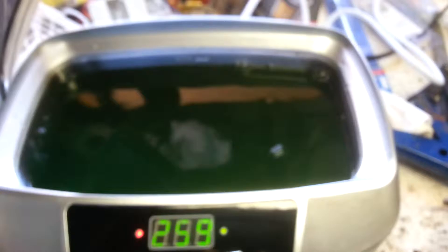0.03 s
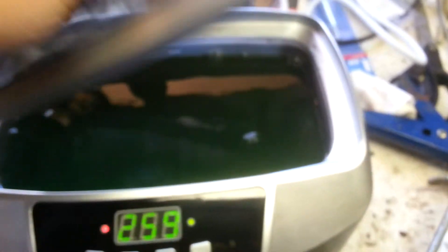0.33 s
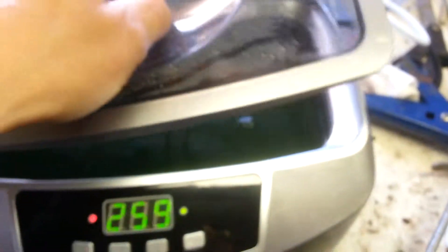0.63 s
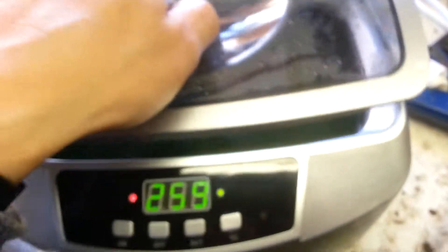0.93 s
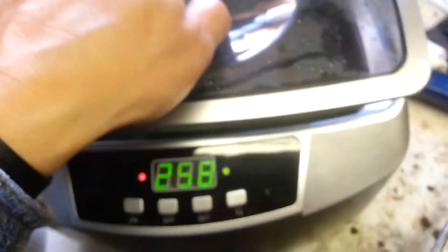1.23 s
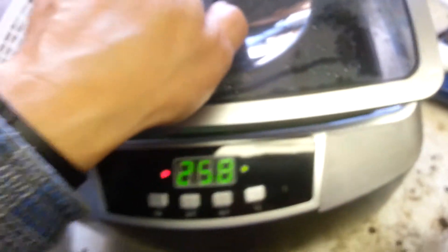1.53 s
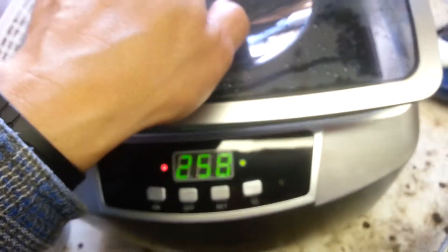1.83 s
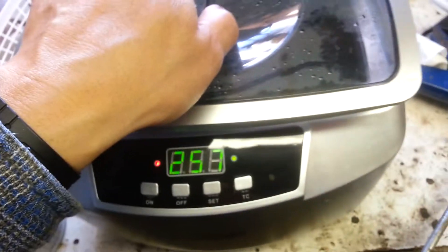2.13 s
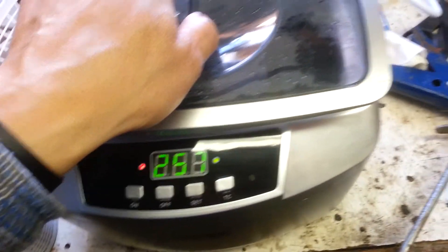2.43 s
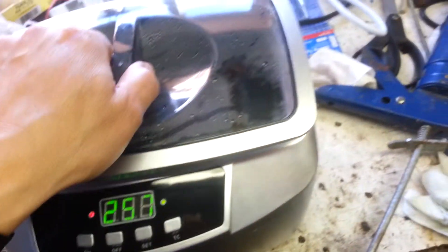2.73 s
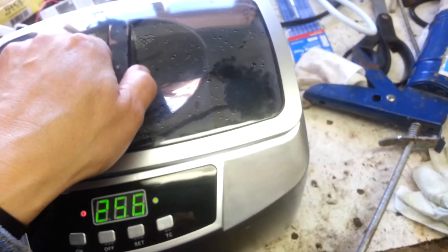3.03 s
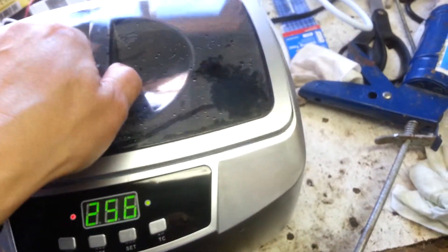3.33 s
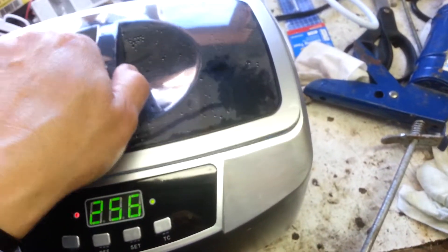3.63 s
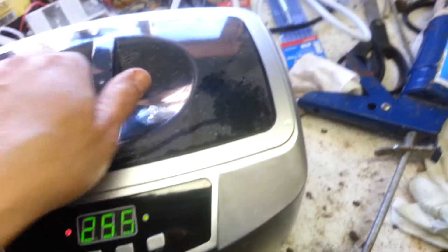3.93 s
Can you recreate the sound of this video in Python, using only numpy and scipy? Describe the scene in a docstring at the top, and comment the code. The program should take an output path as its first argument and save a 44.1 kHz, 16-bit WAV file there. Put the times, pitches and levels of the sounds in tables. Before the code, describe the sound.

An ultrasonic cleaner hisses and buzzes throughout, close on the left, with a high, throbbing ring over a faint low hum. A soft knock dies away at the start. The plastic lid snaps lightly just before 1 second, followed by dull taps until 1.4. The ring surges between 1.5 and 2.2 seconds. The lid clatters at 3 seconds, then knocks and thumps into its seat around 3.5 to 3.7.

```python
"""A pulsing hiss with a high, throbbing ring, close on the left: an ultrasonic cleaner on a workbench.
Cavitation in the bath hisses in bursts, twice per mains cycle, and rings the steel tank
over a low hum and a patchy background rush. A faint knock dies away at the start. A hand brings
the plastic lid over the bath: a snap, a few dull taps, then it clatters and thumps into its seat."""
import sys
import numpy as np
from scipy import signal
from scipy.fft import rfft, irfft
from scipy.io import wavfile
from scipy.ndimage import uniform_filter1d

SR = 44100
rng = np.random.default_rng(int(sys.argv[2]) if len(sys.argv) > 2 else 0)


def pcm_store(signal):
    """Save signal as 16-bit PCM."""
    levels = np.round(np.clip(np.atleast_2d(signal), -1, 1) * 32767)
    wavfile.write(sys.argv[1], SR, levels.astype(np.int16).T)


N = 176400
T = np.arange(N) / SR
HZ = np.fft.rfftfreq(N, 1 / SR)
MAINS_HZ = 59.985
FRAMES = dict(nperseg=2048, noverlap=1536)

# Table levels are relative within each source; pan_db is left minus right.
# finest bubbles: time_s, level_db, pan_db
FIZZ_LEVEL = [(0.02, -32, 11), (0.1, -29, 7.5), (0.2, -31.5, 9), (0.46, -30.5, 10), (0.8, -31, 9.5),
              (1.17, -28.5, 13), (1.93, -28.5, 16), (1.95, -29.5, 13), (2.57, -27.5, 17), (2.79, -28.5, 16),
              (2.86, -27.5, 19.5), (3.0, -27, 15), (3.02, -26.5, 18.5), (3.21, -28.5, 12), (3.47, -26, 17),
              (3.5, -28, 11), (3.55, -30, 13), (3.65, -25.5, 17), (3.82, -31.5, 16), (3.98, -30.5, 28)]
# fizz, bath open: freq_hz, density_db
FIZZ_OPEN = [(5000, -28), (7000, -6.5), (8500, -6), (9500, -4), (10500, 2.5), (11200, 6), (12000, 1),
             (13300, 2), (14500, -1)]
# fizz, bath covered: freq_hz, density_db
FIZZ_COVERED = [(5000, -66), (7000, -12.5), (8500, -14), (9500, -7), (10500, -3), (11200, 3), (12000, 1),
                (13300, 3.5), (14500, -2.5)]
# fizz, right channel: freq_hz, extra_db
FIZZ_RIGHT = [(7000, 5), (9000, -1), (11000, -6.5), (13000, -6), (14400, -1)]
# coarser bubbles: time_s, level_db, pan_db
SIZZLE_LEVEL = [(0.02, -39, 7), (0.47, -37, 12), (0.67, -40, 11), (0.8, -37.5, 15), (0.91, -37, 6.5),
                (1.13, -36.5, 11.5), (1.3, -37, 12), (1.72, -37.5, 11.5), (2.29, -37, 13.5),
                (3.14, -35.5, 10), (3.2, -36, 12), (3.38, -35.5, 10), (3.55, -35.5, 12), (3.7, -35, 8.5),
                (3.76, -36.5, 12), (3.98, -36, 11)]
# sizzle: freq_hz, density_db
SIZZLE_SPECTRUM = [(1700, -28), (2050, -14.5), (2350, -4), (3000, -4.5), (3600, 2.5), (4500, -2),
                   (5500, -4), (6100, -3), (6800, -8), (8500, -10)]
# sizzle, bath open: freq_hz, extra_db
SIZZLE_OPEN = [(1800, 11), (2500, 1.5), (3000, -0.5), (3600, -3.5), (4500, -2), (5500, -4.5), (7000, -4.5)]
# sizzle, right channel: freq_hz, extra_db
SIZZLE_RIGHT = [(2000, 7.5), (2800, 5.5), (3500, 8.5), (3700, -20), (4000, -9), (4500, -4), (5200, -1.5),
                (6000, -4), (6600, 6.5)]
# tank resonances: centre_hz, width_hz, lift_open_db, lift_ajar_db, lift_seated_db
TANK_MODES = [(2700, 110, 0, 6.4, 2.2), (3993, 59, 7, 7.9, 3.4), (4137, 36, 9.5, 8.9, 4.8),
              (4370, 97, 7, 9.6, 7.2), (4680, 59, 7.5, 6, 5.5), (4720, 40, 8, 4.9, 11),
              (5160, 110, 12, 13.4, 9.7), (5730, 250, 10, 6.9, 3.4), (6470, 380, 14.5, 12.4, 6.9)]
# band cancelled by the lid's reflection: time_s, centre_hz, gain_db
LID_NOTCH = [(0.45, 5300, 0), (0.7, 5420, -7), (0.99, 5520, -15), (1.12, 6080, -8), (2.35, 6170, -8),
             (2.7, 6170, -1)]
# main tank resonance: freq_hz, density_db
RING_SPECTRUM = [(2700, -60), (3050, -25), (3140, -4.5), (3190, 5), (3245, -9), (3325, 5.5), (3375, 3),
                 (3480, -13), (3650, -19), (4000, -27)]
# ring contour, before scaling by swing: time_s, level_db
RING_CONTOUR = [(0.02, -47), (0.13, -43), (0.22, -46), (0.25, -26.5), (0.35, -55.5), (0.41, -28.5),
                (0.45, -43), (0.53, -25), (0.65, -35), (0.67, -21), (0.79, -45), (0.81, -32), (0.92, -49),
                (1.04, -40), (1.07, -48), (1.17, -25), (1.24, -36), (1.27, -19), (1.35, -40), (1.4, -20),
                (1.42, -29), (1.46, -41), (1.53, -11), (1.56, -36), (1.59, -16.5), (1.75, -50.5),
                (1.77, -28.5), (1.83, -34), (1.86, -37.5), (1.92, -28.5), (1.94, -38), (1.98, -14),
                (2.05, -31), (2.07, -30), (2.26, -37), (2.28, -34), (2.38, -33), (2.46, -50), (2.48, -37.5),
                (2.62, -35), (2.64, -30), (2.72, -47), (2.99, -31), (3.01, -41), (3.06, -19), (3.16, -45),
                (3.2, -32), (3.26, -49), (3.43, -36), (3.47, -50), (3.5, -21), (3.55, -36), (3.57, -16),
                (3.59, -50), (3.64, -37), (3.68, -34.5), (3.85, -29.5), (3.88, -17), (3.9, -36),
                (3.98, -22)]
# ring and whine position: time_s, pan_db
RING_PAN = [(0.02, 23), (0.59, 16), (0.81, 11.5), (2.18, 20), (2.57, 8), (3.98, 18)]
# surges of the main mode: peak_s, level_db, half_length_s, pitch_hz
WHINES = [(0.53, -33, .025, 3300), (0.69, -33, .03, 3220), (1.53, -28.5, .018, 3345),
          (1.597, -26.5, .012, 3345), (1.825, -30, .012, 3360), (1.983, -26.5, .012, 3330),
          (2.015, -30, .018, 3340), (2.083, -28.5, .018, 3360), (2.13, -29, .012, 3350),
          (2.167, -28, .011, 3375), (2.21, -31, .018, 3350), (3.88, -31, .015, 3230),
          (3.972, -29.5, .015, 3300)]
# lid on rim: start_s, level_db, favoured_hz, clack_db, t60_ratio
KNOCKS = [(0.001, -21.5, 716, -15, 0.58), (2.997, -26, 1090, 16, 0.49), (3.015, -30, 1700, 12, 0.8),
          (3.0235, -24.5, 1500, 1.5, 1.2), (3.0525, -9.5, 478, -8, 0.82), (3.069, -9, 640, -2.5, 0.78),
          (3.0805, -2.5, 537, -8, 0.71), (3.0885, -3.5, 665, -19, 0.65), (3.1015, -18.5, 520, -18, 1.5),
          (3.149, -15, 465, -7, 0.46), (3.165, -19, 437, -11, 0.88), (3.417, -26, 424, 5, 0.61),
          (3.443, -24, 600, -9, 0.55), (3.497, -6.5, 650, 1, 1), (3.5105, -14, 670, 11, 0.54),
          (3.5142, -3, 666, -6.5, 0.69), (3.5205, -25, 700, 8, 0.27), (3.577, -12.5, 650, -19, 0.33),
          (3.6645, -13.5, 713, 0, 0.74), (3.932, -18, 357, -14, 0.1)]
# lid and case modes: freq_hz, level_db, t60_s
LID_MODES = [(299, 11.5, 0.087), (344, 12, 0.061), (395.5, 7, 0.22), (440, 9.5, 0.052), (555, 10.5, 0.086),
             (640, 15, 0.051), (662, 10.5, 0.064), (694, -31.5, 0.2), (944, 13.5, 0.19), (1154, 12, 0.08),
             (1456, 8, 0.06), (1717, 10, 0.14), (2070, -45, 0.034), (2230, 1, .07)]
# lid edge clack: freq_hz, density_db
CLACK_SPECTRUM = [(40, -31), (150, -14), (500, 4.5), (700, 8), (900, -7), (1300, 1.5), (1800, -2),
                  (2600, -7.5), (4200, -10.5), (5200, -19), (8000, -21), (14000, -40)]
# clack, left channel: freq_hz, extra_db
CLACK_LEFT = [(1200, 1), (2400, 7), (4200, 15), (6000, 7)]
# low thumps, a dying knock then the lid seating: start_s, level_db, final_hz, t60_s, sag_ratio
THUMPS = [(0.001, -21, 162, 0.043, 0.38), (0.002, -33.5, 323, 0.1, 0.32), (3.149, -16.5, 423, 0.029, .1),
          (3.5139, -9, 401, 0.091, 0.16), (3.585, -21, 380, 0.042, 0.21), (3.668, -12.5, 351, 0.073, 0.54),
          (3.67, -22.5, 171, 0.055, 0.32)]
# touches on the carried lid: start_s, level_db, pitch_hz, t60_s, pan_db
TAPS = [(1.089, -11, 404, 0.0022, 26), (1.1761, -22, 526, 0.011, 29), (1.2502, -14.5, 281, 0.0087, 32),
        (1.2813, -9.5, 296, 0.0089, 32), (1.3518, -8.5, 500, 0.007, 28), (1.381, -6, 414, 0.006, 30),
        (1.396, -17.5, 606, 0.013, 22)]
# mains hum: harmonic, level_db
HUM_LINES = [(6, -60.5), (7, -63), (8, -63), (12, -67)]
# low background rush: freq_hz, density_db
RUSH_SPECTRUM = [(25, -36), (90, 2), (140, -3.5), (220, 7.5), (300, -4), (360, 6), (420, 7.5), (500, 2),
                 (580, -5), (690, 4), (800, -3), (880, 1.5), (950, 1.5), (1080, -3), (1200, 2),
                 (1400, -3.5), (1510, -5.5), (1700, -6.5), (2100, -1), (3000, -34)]
# rush, band gaps on the left: freq_hz, extra_db
RUSH_LEFT = [(120, -42), (220, -1), (720, 5), (850, -32), (950, 4.5), (1100, -44), (1210, -3.5),
             (1350, -22), (1510, 13), (1750, -53), (2100, 3.5)]
# rush contour: time_s, level_db
RUSH_LEVEL = [(0.1, -50.5), (1.39, -43), (2.42, -47.5), (3.4, -43), (3.65, -40), (3.75, -42), (3.98, -44.5)]
# rush, left-right likeness: freq_hz, correlation
RUSH_CORRELATION = [(100, 0.2), (300, 0.79), (700, 0.49), (1000, 0.11), (2000, 0.082)]
# handling bumps: peak_s, level_db, half_length_s
BUMPS = [(0.025, -47, 0.087), (0.1, -57, 0.12), (0.526, -49, 0.044), (0.597, -41, 0.019),
         (0.853, -47, .025), (0.907, -51, 0.019), (1.185, -37, 0.035), (1.274, -39, 0.04),
         (1.372, -40, 0.02)]


def fizz(gain_db=3, flutter_db=0.68, cover_mid_s=1.0, cover_span_s=0.24):
    """The finest bubbles collapse in a top hiss; its colour shifts as the lid covers the bath."""
    covered_db, open_db = spectrum(FIZZ_COVERED), spectrum(FIZZ_OPEN)
    covered_hiss = drifting_hiss(covered_db + np.array([0 * HZ, spectrum(FIZZ_RIGHT)]))
    open_hiss = unit_rms(irfft(rfft(covered_hiss) * amp(open_db - covered_db), N))
    covered = ramp(T, cover_mid_s, cover_span_s)
    hiss = (1 - covered) * open_hiss + covered * covered_hiss
    level_db = curve(FIZZ_LEVEL) + gain_db + flutter_db * wander(56)
    return hiss * bursts(depth_db=4.5, lag=0.91) * amp(level_db) * pan(curve(FIZZ_LEVEL, column=2))


def drifting_hiss(density_db, comb_db=2, width_hz=57, count=16):
    """Small tank and bench resonances comb the hiss, shifting as hand, lid and microphone move."""
    kernel = np.exp(-.5 * (np.linspace(-500, 500, N // SR * 1000) / width_hz) ** 2)
    position = T / T[-1] * (count - 1)
    hiss = np.zeros((2, N))
    for k in range(count):
        comb = unit_rms(signal.fftconvolve(rng.standard_normal(len(HZ)), kernel, "same"))
        fade = np.cos(np.pi / 2 * np.minimum(abs(position - k), 1))
        hiss += fade * noise(density_db + comb_db * comb, correlation=0)
    return hiss


def bursts(depth_db, lag):
    """The drive swells twice per mains cycle; lag is a fraction of one burst."""
    return unit_rms(amp(depth_db * abs(np.sin(np.pi * (2 * MAINS_HZ * T - lag)))))


def sizzle(gain_db=6, flutter_db=0.94, grain_db=0.5, patch_db=2):
    """Larger bubbles collapse, heard through the tank's resonances."""
    hz, t, bins = signal.stft(rng.standard_normal((2, N)), SR, **FRAMES)
    hz = hz[:, None]
    left_db = spectrum(SIZZLE_SPECTRUM, hz) + tank_colour_db(hz, t)
    right_db = left_db + spectrum(SIZZLE_RIGHT, hz)
    colour_db = np.array([left_db, right_db]) + patch_db * patches(bins.shape)
    hiss = unit_rms(signal.istft(bins * amp(colour_db), **FRAMES)[1][:, :N])
    level_db = curve(SIZZLE_LEVEL) + gain_db + flutter_db * wander(21) + grain_db * wander(1800)
    return hiss * bursts(depth_db=4, lag=0.78) * amp(level_db) * pan(curve(SIZZLE_LEVEL, column=2))


def tank_colour_db(hz, t, sway_hz=14, notch_width_hz=300):
    """Tank resonances sway with the water and change under the lid, whose reflection cuts a notch."""
    covered = ramp(t, mid_s=1.116, span_s=0.084)
    seated = ramp(t, mid_s=2.15, span_s=0.41)
    colour_db = (1 - covered) * spectrum(SIZZLE_OPEN, hz)
    for centre_hz, width_hz, *lifts_db in TANK_MODES:
        mode_hz = centre_hz + sway_hz * np.interp(t, T, wander(4.7))
        lift_db = np.interp(covered + seated, [0, 1, 2], lifts_db)
        colour_db += lift_db / (1 + (2 * (hz - mode_hz) / width_hz) ** 2)
    notch_hz, notch_db = curve(LID_NOTCH, column=1, t=t), curve(LID_NOTCH, column=2, t=t)
    return colour_db + notch_db * np.exp(-(2 * (hz - notch_hz) / notch_width_hz) ** 2)


def tank_song(takeover=0.6):
    """The tank rings; in short surges a whine takes over."""
    surges = np.array([bell(peak_s, half_s) for peak_s, _, half_s, _ in WHINES])
    return (whine(surges) + ring() * (1 - takeover * surges.max(0))) * pan(curve(RING_PAN))


def ring(gain_db=3, throb_db=1.72, steadiness=0.12, swing=0.47):
    """The tank's close pair of modes sings, throbbing as the water sways."""
    analytic = signal.hilbert(noise(spectrum(RING_SPECTRUM), correlation=-0.83))
    song = unit_rms(analytic.real / (abs(analytic) + 1e-6) ** steadiness)  # flattens the envelope a bit
    contour_db = curve(RING_CONTOUR)
    level_db = contour_db.mean() + swing * (contour_db - contour_db.mean())
    return song * bursts(depth_db=6, lag=0.098) * amp(level_db + gain_db + throb_db * wander(59))


def whine(surges, jitter_hz=15):
    """The tank's main mode tightens to one pitch."""
    swell = amp([level_db for _, level_db, _, _ in WHINES]) @ surges
    pitch_hz = curve(WHINES, column=3) + jitter_hz * wander(34.3)
    return swell * np.sqrt(2) * sine(pitch_hz) * bursts(depth_db=5, lag=0.05)


def lid(tap_send=0.23):
    """A faint opening knock, then the lid is carried over and seated; the contacts excite the room."""
    taps, knocks = np.zeros((2, 2, N))
    for start_s, *row in TAPS:
        add(taps, start_s, tap(*row))
    add(taps, start_s=0.9383, sound=snap())
    for start_s, *row in THUMPS:
        add(knocks, start_s, thump(*row))
    clack_db = spectrum(CLACK_SPECTRUM) + np.array([spectrum(CLACK_LEFT), 0 * HZ])
    clack_noise, size = noise(clack_db, correlation=0.46), SR // 5
    for k, (start_s, *row) in enumerate(KNOCKS):
        edge_noise = np.roll(clack_noise, -k * size, 1)[:, :size]
        add(knocks, start_s, knock(*row, edge_noise))
    return taps + knocks + room(knocks + tap_send * taps)


def knock(level_db, favoured_hz, clack_db, t60_ratio, edge_noise,
          favour_db=18.5, favour_octaves=0.22, clack_t60_s=0.12):
    """Lid meets rim: the contact point favours some modes, the hand damps them, the edge clacks."""
    t = np.arange(edge_noise.shape[1]) / SR
    mode_hz, mode_db, t60_s = np.transpose(LID_MODES)[:, :, None]
    favour = np.exp(-.5 * (np.log2(mode_hz / favoured_hz) / favour_octaves) ** 2)
    modes = amp(mode_db + favour_db * favour) * np.sin(2 * np.pi * mode_hz * t)
    body = (modes * decay(t, t60_s * t60_ratio)).sum(0)
    body *= amp(1) / abs(body).max()
    clack = edge_noise * amp(clack_db - 8) * decay(t, clack_t60_s * t60_ratio)
    return amp(level_db) * (body + clack) * attack(t, rise_s=0.00057) * pan(-0.2)


def thump(level_db, final_hz, t60_s, sag_ratio, glide_s=0.0075, gain_db=6):
    """Low thump rising in pitch: a faint dying knock at the start, then the lid seating."""
    t = np.arange(SR // 4) / SR
    boom = sine(final_hz * (1 - sag_ratio * np.exp(-t / glide_s)))
    return amp(level_db + gain_db) * boom * attack(t, rise_s=0.0082) * decay(t, t60_s) * pan(0)


def tap(level_db, pitch_hz, t60_s, pan_db, overtone_ratio=2.1, overtone_db=-9, gain_db=1):
    """A damped touch on the held lid: a brief ring and a faster-dying overtone."""
    t = np.arange(SR // 20) / SR
    phase = 2 * np.pi * pitch_hz * t
    overtone = amp(overtone_db) * np.sin(overtone_ratio * phase) * decay(t, 0.6 * t60_s)
    touch = np.sin(phase) * decay(t, t60_s) + overtone
    return amp(level_db + gain_db) * touch * attack(t, rise_s=0.00017) * pan(pan_db)


def snap(gain_db=-9, pitch_hz=906, grit_db=-15, low_cut_hz=400):
    """The lid's edge snaps on the rim: a short ring, brighter edge modes, a gritty scrape."""
    t = np.arange(SR // 20) / SR
    body = np.sin(2 * np.pi * pitch_hz * t) * decay(t, t60_s=0.014)
    edge_hz_db = [(1350, 10.5), (2350, 9), (2850, 3), (3600, -15)]
    edge = sum(amp(db) * np.sin(2 * np.pi * hz * t) for hz, db in edge_hz_db) * decay(t, t60_s=0.003)
    grit_hz_db = [(200, -17), (750, -3), (1400, -1), (2700, -3), (5000, -31), (12000, -50)]
    grit = noise(spectrum(grit_hz_db), correlation=0.96)[:, :len(t)] * decay(t, t60_s=0.025)
    click = (body + edge + amp(grit_db) * grit) * attack(t, rise_s=0.00032)
    return amp(gain_db) * signal.lfilter(*signal.butter(1, low_cut_hz, "high", fs=SR), click) * pan(14)


def hum(waver_db=2, jitter_hz=4):
    """Rough mains harmonics from the case."""
    lines = np.zeros(N)
    for harmonic, level_db in HUM_LINES:
        peak = np.sqrt(2) * amp(level_db + waver_db * wander(8))
        lines += peak * sine(harmonic * MAINS_HZ + jitter_hz * wander(24))
    return lines


def handling(gain_db=4):
    """Faint low bumps as the hand moves."""
    swell = sum(amp(level_db) * bell(peak_s, half_s) for peak_s, level_db, half_s in BUMPS)
    rumble_hz_db = [(20, -4), (60, -1), (110, 2.5), (180, -10), (400, -12), (1500, -58)]
    return amp(gain_db) * swell * noise(spectrum(rumble_hz_db), correlation=0.27) * pan(25)


def rush(gain_db=1, swell_db=1, patch_db=4.5):
    """Low, patchy background rush, hollow and band-gapped on the left."""
    density_db = spectrum(RUSH_SPECTRUM) + np.array([spectrum(RUSH_LEFT), 0 * HZ])
    bins = signal.stft(noise(density_db, spectrum(RUSH_CORRELATION)), **FRAMES)[2]
    bins *= amp(patch_db * patches(bins.shape[1:]))
    wash = unit_rms(signal.istft(bins, **FRAMES)[1][:, :N])
    return wash * amp(curve(RUSH_LEVEL) + gain_db + swell_db * wander(11))


def room(dry, t60_s=0.45, gain_db=-21.5):
    """Small workshop: a short, dull tail."""
    t = np.arange(SR // 2) / SR
    tail_hz_db = [(100, 13.5), (700, 4.5), (3000, 0.5), (10000, -30)]
    tail = noise(spectrum(tail_hz_db), correlation=0.8)[:, :len(t)]
    tail *= decay(t, t60_s) * np.minimum(t / 0.0014, 1)
    return amp(gain_db) * signal.fftconvolve(dry, tail / np.linalg.norm(tail[0]), axes=1)[:, :N]


def amp(db):
    return 10 ** (np.asarray(db) / 20)


def unit_rms(x):
    return x / np.sqrt(np.mean(x ** 2) + 1e-20)


def sine(hz):
    return np.sin(2 * np.pi * np.cumsum(hz) / SR)


def attack(t, rise_s):
    return 1 - np.exp(-t / rise_s)


def decay(t, t60_s):
    return amp(-60 * t / t60_s)


def ramp(t, mid_s, span_s):
    return np.clip((t - mid_s) / span_s + .5, 0, 1)


def bell(peak_s, half_s):
    return np.exp(-((T - peak_s) / half_s) ** 2)


def spectrum(points, hz=HZ):
    """Table interpolated over log frequency."""
    freq_hz, values = np.transpose(points)
    return np.interp(np.log(hz + 1), np.log(freq_hz + 1), values)


def curve(rows, column=1, t=T):
    """Table column interpolated over time."""
    rows = np.array(rows)
    return np.interp(t, rows[:, 0], rows[:, column])


def add(mix, start_s, sound):
    """Mixes a stereo sound in place."""
    part = mix[:, round(start_s * SR):][:, :sound.shape[1]]
    part += sound[:, :part.shape[1]]


def pan(pan_db):
    """Left and right gains, mean square 1."""
    gains = amp(np.array([[1], [-1]]) * pan_db / 2)
    return gains / np.sqrt((gains ** 2).mean(0))


def wander(rate_hz):
    """Smooth random drift up to about rate_hz, unit rms."""
    return unit_rms(irfft(rfft(rng.standard_normal(N)) / (1 + (HZ / rate_hz) ** 4), N))


def noise(density_db, correlation):
    """Shaped stereo noise, unit rms."""
    left, independent = rfft(rng.standard_normal((2, N)))
    right = correlation * left + np.sqrt(1 - correlation ** 2) * independent
    return unit_rms(irfft(np.array([left, right]) * amp(density_db), N))


def patches(shape):
    """Random patches, about 90 Hz by 0.3 s, unit rms."""
    bands = uniform_filter1d(rng.standard_normal(shape), size=4, axis=-2)
    return unit_rms(uniform_filter1d(bands, size=26, axis=-1))


def scene():
    """The running bath and its lid."""
    return fizz() + sizzle() + tank_song() + hum() + rush() + handling() + lid()


def record(dry):
    """Bass cut at 170 Hz, steep band limit at 14680 Hz."""
    thin = signal.sosfilt(signal.butter(3, 170, "high", fs=SR, output="sos"), dry)
    band_limit = signal.firwin(511, 14680, window=("kaiser", 9), fs=SR)
    return signal.oaconvolve(thin, band_limit[None], "same")


dry = scene()
out = record(dry)
pcm_store(out)
```